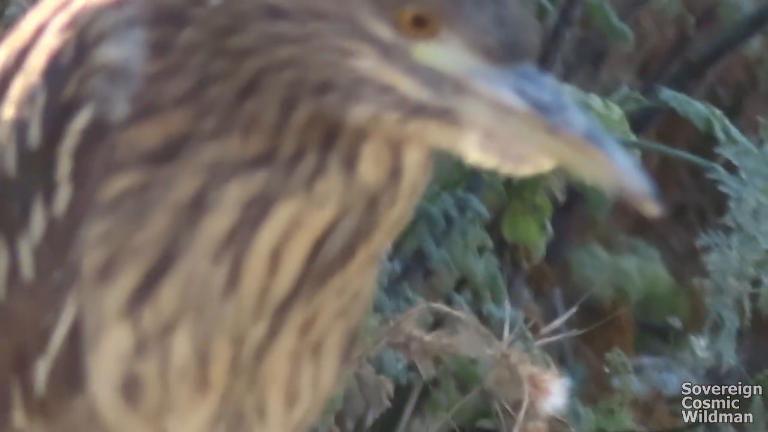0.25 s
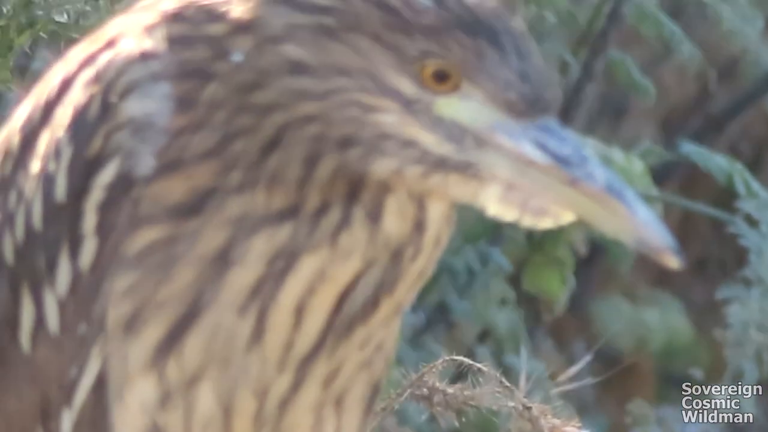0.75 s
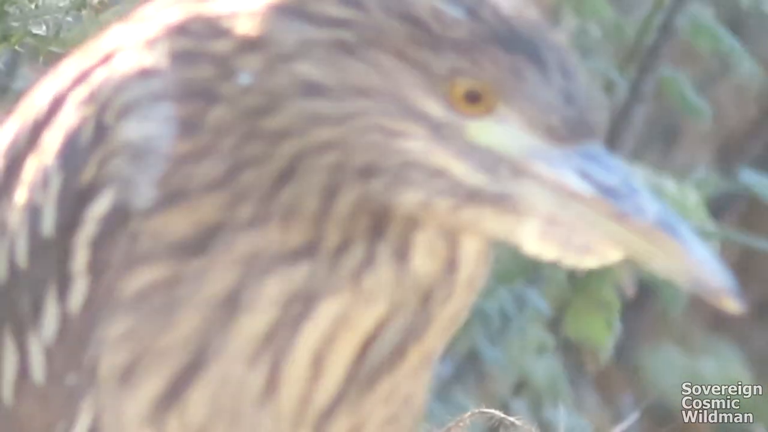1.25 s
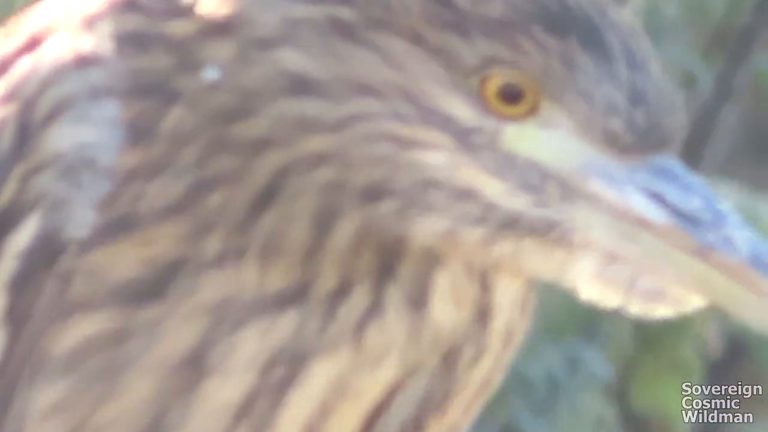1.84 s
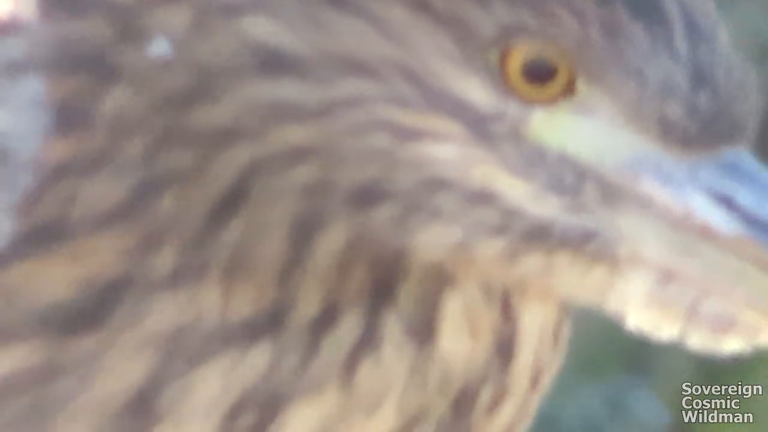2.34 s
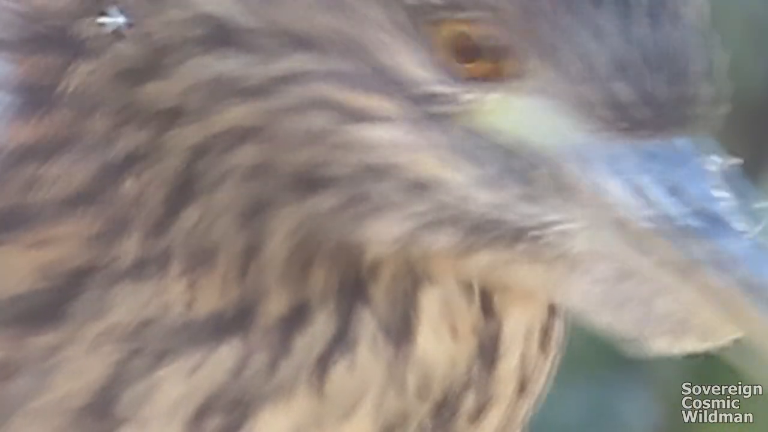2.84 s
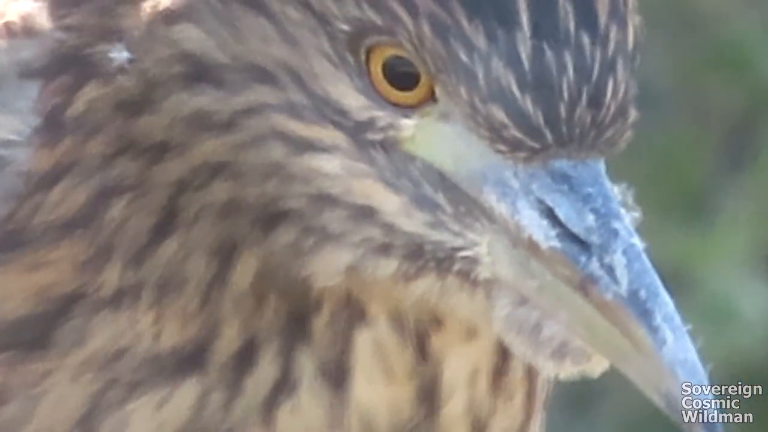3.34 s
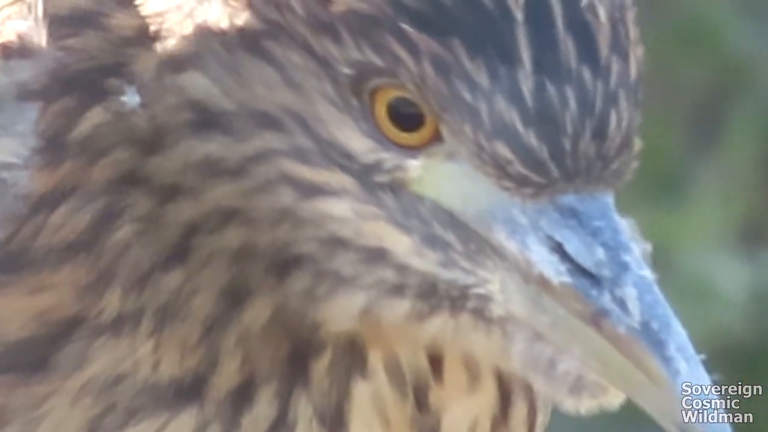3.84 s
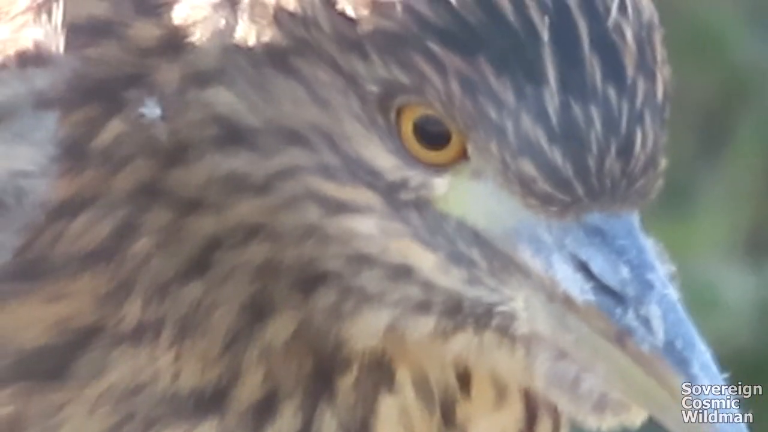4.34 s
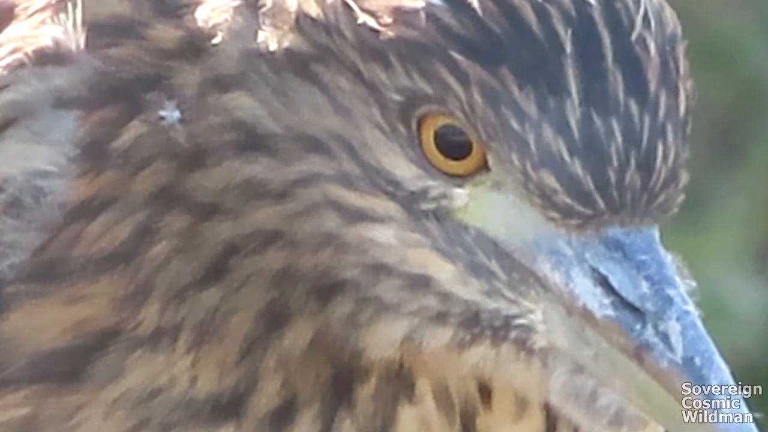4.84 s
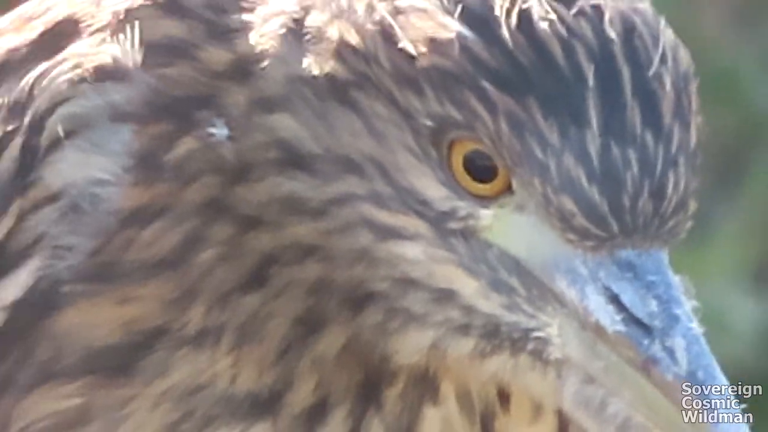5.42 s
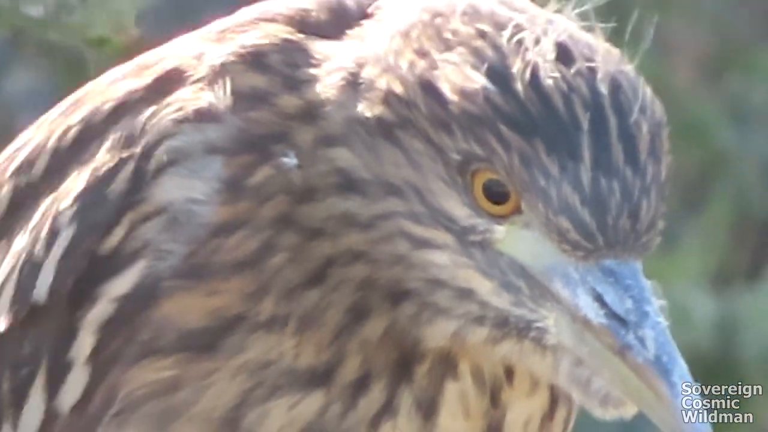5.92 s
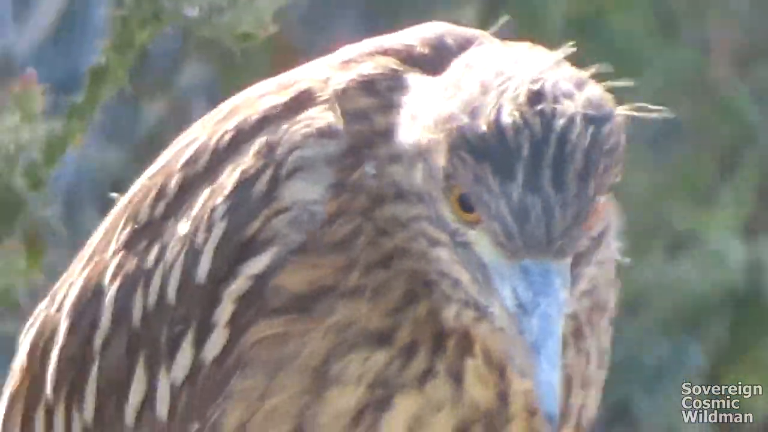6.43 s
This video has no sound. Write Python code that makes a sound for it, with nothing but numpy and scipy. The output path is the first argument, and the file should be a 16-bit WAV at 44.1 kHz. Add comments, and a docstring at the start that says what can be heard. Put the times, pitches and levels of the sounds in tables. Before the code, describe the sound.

From 0 to 0.35 s a small lens motor whines and buzzes close by, with muffled uneven gear knocks. Two light ticks follow, then around 0.42-0.48 s a plastic lever rattles and snaps sharply. From 0.6 to 2.8 s dry little ticks come roughly ten per second over a faint plastic whir; afterwards they are scattered, at 3.2, clustered at 4.3-4.5, and occasional until 5.8 s. Throughout, distant traffic roars softly and an engine idles with a steady low throb. Faint blurred bird notes appear from 0.75 s, and a wavering whistle at 2.5-2.85 s. Nearer falling whistles sound at 3.2-3.55, 3.95-4.15 and, strongest, 4.8-5.15 s, with short leafy echoes. A high chirp comes at 5.7, one soft low hoot at 6.1, quick whistles at 6.4 and a last cut-off note at 6.65 s. Camera sounds lean slightly left in the outdoor stereo.

```python
"""A lens motor whines and knocks at the start; then a lever rattles and snaps and the lens drive ticks.
These contacts ring damped modes of the hand-held camera, over a faint whir in its plastic body.
Outdoors near bushes, small birds whistle gliding sines with leaf echoes, and a low hoot sounds once.
Behind them an engine idles as a sum of harmonics, and far traffic roars softly as shaped stereo noise."""
import sys
import numpy as np
from scipy import signal
from scipy.io import wavfile

SR = 44100
rng = np.random.default_rng(int(sys.argv[2]) if len(sys.argv) > 2 else 0)


def inscribe(sig):
    """Save sig as 16-bit PCM at rate SR to the path in sys.argv[1].

    A 1-D sig is mono; a 2-D sig holds one channel per row.
    Samples are clipped to [-1, 1] before scaling.
    """
    pcm = np.round(np.clip(np.atleast_2d(sig).T, -1, 1) * 32767)
    wavfile.write(sys.argv[1], SR, pcm.astype(np.int16))


N = 294367   # length in samples

MOTOR_END_S = .345


def motor_running():
    """Switching envelope: 1 while the lens motor turns, then a quick linear fall to 0."""
    return np.clip((MOTOR_END_S - np.arange(N) / SR) / .012, 0, 1)


# Resonances of the lens motor housing. Each row: frequency in Hz, width in Hz, whine in dB rms and
# struck level in dB (both before the final low-pass), share of a knock's weight from 0 to 1.
MOTOR_MODES = [(292, 170, -54.5, -8, 0.6), (376, 115, -77, -1, 0.97), (780, 85, -58, 1, 0.14),
               (1054, 100, -59, -6, 0.3), (1500, 20, -61, -26, 0), (1550, 400, -60, -26, 0.2),
               (1690, 70, -56, -28, 0.08)]
# Gear knocks of the motor. Each row: start in seconds, level in dB before the mode gains,
# weight of the low thud in dB, extra level of the modes above 900 Hz in dB.
GEAR_KNOCKS = [(.016, -35, 5.5, 7), (0.041, -36, 1, -12), (.05, -31, -11, -9), (.076, -30, -9, -14),
               (.114, -34, -10, -6), (0.146, -31, 5, -7), (.156, -43, -1, 16), (0.178, -37, 9, -6),
               (.196, -29, -8, -13), (0.219, -42, 9, 12), (0.255, -38, 3, -3), (.277, -29.5, -19, -7),
               (.298, -42, -11, -11), (.318, -31.5, 4, -7), (.341, -30, 8, -4)]
TOOTH_GRAIN_DB = 2   # uneven teeth make the whine buzz
WHINE_HZ, WHINE_DB, WHINE_WAVER = 1505, -56.5, .009   # steady tone of the meshing gear, share it wanders


def lens_motor():
    """Forced and free vibration: gear noise drives the housing's resonances and gear knocks let them ring."""
    s, knock_db, weight_db, upper_db = np.transpose(GEAR_KNOCKS)
    gears = rng.standard_normal(N) * from_db(TOOTH_GRAIN_DB * drift(79.0))
    running = motor_running()
    out = np.zeros(N)
    for hz, width, whine_db, struck_db, share in MOTOR_MODES:
        t60 = np.log(1000) / np.pi / width   # a resonance of this width dies by 60 dB in this time
        clicks = np.zeros(N)
        clicks[(s * SR).astype(int)] = from_db(knock_db + struck_db + share * weight_db + upper_db * (hz > 900))
        out += running * from_db(whine_db) * rms_one(ring(gears, hz, t60))
        out += ring(soften(clicks, 2 * hz), hz, t60)
    whine_hz = WHINE_HZ * (1 + WHINE_WAVER * drift(15.0))
    whine = np.sqrt(2) * np.sin(2 * np.pi * np.cumsum(whine_hz) / SR)
    out += running * from_db(WHINE_DB + TOOTH_GRAIN_DB * drift(25.0)) * whine
    return soften(soften(out, hz=2100), hz=2100)   # the housing passes little above its top mode


# Ticks of the lens drive, a run of ticks while it zooms, lone ones before and after. Each row: start in
# seconds, level in dB before the bounce and mode gains, brightness in dB per octave.
TICKS = [(.377, -32.5, -2), (.391, -32.5, 2.5), (0.6243, -32.5, 5), (0.694, -32, -2), (.794, -36, -15),
         (0.8944, -29, -2.5), (0.995, -33, -11), (1.094, -29.5, -10), (1.195, -41, 3.5), (1.26, -32, -8),
         (1.361, -32.5, 1.5), (1.444, -40, 3.5), (1.461, -31.5, -0.5), (1.561, -37, 3.5),
         (1.661, -31.5, -1), (1.728, -33.5, -9), (1.827, -27.5, -0.5), (1.894, -31.5, 0.5),
         (1.993, -31, -1), (2.062, -32, 2), (2.161, -31, -1), (2.216, -41, 6), (2.229, -30, 1),
         (2.328, -32, 1), (2.395, -32.5, 2), (2.495, -33, 2), (2.563, -33.5, 1), (2.688, -40, 1),
         (2.786, -36, 4), (3.165, -32, 0.5), (3.272, -32.5, 1.5), (4.277, -42.5, 6.5), (4.357, -36, 3.5),
         (4.393, -31.5, -0.5), (4.449, -32.5, 0), (4.474, -31, -1.5), (4.734, -37, 1), (4.9, -34, 3.5),
         (5.09, -30.5, 1), (5.387, -33.5, -0.5), (5.759, -39, -12)]
# Strokes of the lever on the body. Each row: start in seconds, length in seconds, contacts per second,
# level in dB before the mode gains, brightness in dB per octave, contact hardness in Hz.
LEVER = [(0.4155, .024, 404, -33.5, 2, 2480), (0.437, .008, 360, -40.5, 6, 3300),
         (0.443, .009, 630, -72, 14.5, 6500), (0.4678, 0.002, 1800, -37, 6, 4530),
         (0.4697, 0.003, 840, -23.5, -0.5, 4500), (0.473, 0.004, 850, -40, 5.5, 2000),
         (0.481, .003, 810, -31, -2.5, 4500)]
TICK_HARDNESS_HZ = 2300


def contacts(uneven_s):
    """Repeated impact: a tick bounces twice and the lever chatters unevenly; returns one column per property."""
    rows = []
    for s, db, bright in TICKS:
        for lag, drop_db in [(0, -5.5), (.0024, -17), (.0052, -28.5)]:
            rows.append((s + lag, db + drop_db, bright, TICK_HARDNESS_HZ, 1))
    for s, length, per_s, db, bright, hard_hz in LEVER:
        lags = np.arange(0, length, 1 / per_s)
        rows += [(s + lag, db, bright, hard_hz, 0) for lag in lags + uneven_s * rng.random(len(lags))]
    s, db, bright, hard_hz, is_tick = np.transpose(rows)
    return (s * SR).astype(int), db, bright, hard_hz, is_tick


CRACK_DB, CRACK_S, CRACK_HZ = -7.5, 0.0054, (1190, 2090)   # dry noise of a contact: level, dying time, flat band
TICK_CRACK_DB = -9   # the lens drive knocks with less dry noise than the lever


def crack(at, gains):
    """Broadband impact noise: each contact also gives a short, exponentially dying burst."""
    clicks = np.zeros(N)
    clicks[at] = gains
    envelope = signal.lfilter([1], [1, -np.exp(-1 / (CRACK_S * SR))], clicks + 1e-18)
    bursts = envelope * rng.standard_normal(N)
    return soften(signal.lfilter(*signal.butter(1, CRACK_HZ, "band", fs=SR), bursts), hz=4500)


# Modes of the camera body. Each row: frequency in Hz, level in dB when struck by the lever, level in dB
# when struck by the lens drive, 60 dB decay time in seconds, mean whir in dB rms, left minus right in dB.
BODY_MODES = [(407, -4, -9, 0.07, -66, 3), (437, -14, 1, 0.065, -55.5, 3), (690, -2, -9, .012, -80, 3),
              (842.5, -1, 0.5, 0.029, -51, 4), (967.5, -8, -2, 0.04, -51, 5),
              (1062.5, -11, -11, 0.034, -54, 6.5), (1442, 5, -6, 0.0057, -61.5, 4.5),
              (1570, -6, -20, 0.018, -69.5, 3), (1740, -15, -9, 0.027, -64.5, 5.5),
              (2120, -22, -24, 0.018, -80, -11.5), (2780, -17, -17, 0.016, -92, 6),
              (3530, -26, -24, 0.013, -109, 7), (4320, -27, -27, 0.014, -106, -2),
              (5250, -33, -32, 0.0072, -105, -5), (6730, -32, -31, 0.0066, -74, -1),
              (9100, -29, -29, 0.0022, -99, -10)]
WHIR_DURING_MOTOR_DB = -6


def camera_body(grain_db, lag_s):
    """Modal vibration: knocks and a dense fine grinding ring the same modes, most of them louder at the left."""
    at, knock_db, bright, hard_hz, is_tick = contacts(uneven_s=.0004)
    grinding = rng.standard_normal(N) * from_db(grain_db * drift(36.0) + WHIR_DURING_MOTOR_DB * motor_running())
    lowest_hz = BODY_MODES[0][0]
    out = np.zeros((2, N))
    for k, (hz, lever_db, tick_db, t60, whir_db, left_db) in enumerate(BODY_MODES):
        mode_db = np.where(is_tick, tick_db, lever_db) + bright * np.log2(hz / lowest_hz)
        chance_db = rng.normal(0, 1.2, len(at))
        clicks = np.zeros(N)
        clicks[at] = from_db(knock_db + mode_db + chance_db)
        clicks[at] /= 1 + (hz / hard_hz) ** 4   # a soft contact does not reach the high modes
        knocks = ring(soften(clicks, 2 * hz), hz, t60)
        whir = from_db(whir_db + 1.43 * drift(0.99)) * rms_one(ring(soften(grinding, 2 * hz), hz, t60))
        sense = (-1) ** max(k, 1)   # above the low pair, neighbours start in opposite senses
        out += sense * pan(knocks + whir, left_db)
    crack_db = knock_db + CRACK_DB + TICK_CRACK_DB * is_tick + bright * np.log2(CRACK_HZ[1] / lowest_hz)
    crack_gain = from_db(crack_db) / (1 + (CRACK_HZ[1] / hard_hz) ** 2)
    out += pan(crack(at, crack_gain), left_db=3.0)
    out[1] = np.interp(np.arange(N) - lag_s * SR, np.arange(N), out[1])   # the right port hears it later
    return out


# Loudness of a singing throat by pitch. Each row: pitch in Hz, gain in dB.
THROAT = [(2000, -3), (2450, -6.5), (3100, -1), (3600, -11), (4000, -24), (5000, -23)]
FLICK_S, RIPPLE, SWELL_S = .009, .01, .006   # half width of the flick (s), share the pitch ripples, onset (s)
UPSTROKE_DB = -6   # the rising half of the flick is fainter
ACCENT_DB, ACCENT_S = 4, .018   # the note is struck harder around the peak of a flick


def sung(s, length, flick_hz, from_hz, held_hz, slide, bend, drop_hz, drop, db, fade_db):
    """Frequency modulation: an up-and-down flick, a slide to a held pitch, a drop; the throat weights each pitch."""
    lead = 1.3 * FLICK_S if flick_hz > 300 else 0
    t = np.arange(-lead, length, .0005)
    hz = held_hz + (from_hz - held_hz) * np.clip(1 - t / slide, 0, 1) ** bend
    hz += flick_hz * np.where(t < 0, 1 + t / FLICK_S, np.clip(1 - t / FLICK_S, 0, 1) ** 1.3)
    hz *= 1 + RIPPLE * np.interp(t, np.arange(20) * .008, rng.standard_normal(20))
    hz -= drop_hz * np.clip(1 - (length - t) / drop, 0, 1)
    onset_db = 20 * np.log10(np.clip((t + lead) / SWELL_S, .05, 1))
    onset_db += UPSTROKE_DB * np.clip(-t / FLICK_S, 0, 1)
    onset_db += ACCENT_DB * (lead > 0) * np.exp(-np.abs(t) / ACCENT_S)
    level_db = db + at_hz(THROAT, hz) + fade_db * np.clip(t / length, 0, 1) + onset_db
    return np.transpose([s + t, hz, level_db])


def peep(s, length, from_hz, to_hz, db, waver=0):
    """Decelerating glide: a plain note as a table whose pitch slows to its end while the level swells and sinks."""
    along = np.linspace(0, 1, 3 + int(length / .008))
    hz = to_hz + (from_hz - to_hz) * (1 - along) ** 2
    hz *= 1 + waver * rng.standard_normal(len(along))
    swell_db = 10 * np.log10(np.sin(np.pi * along ** .7) ** 2 + .1)
    return np.transpose([s + length * along, hz, db + swell_db])


# Song of a near bird. Each row: start in seconds, length in seconds, opening flick in Hz, first pitch in Hz,
# held pitch in Hz, slide in seconds, bend of the slide (1 straight, 2 bowed), closing drop in Hz,
# drop time in seconds, level in dB before throat and onset, level change along the note in dB.
SONG = [(3.235, 0.056, 0, 3700, 2600, 0.046, 0.83, 0, .01, -47.5, -2),
        (3.316, 0.095, 804, 2880, 2390, 0.043, 1.1, 452, 0.018, -47.5, -3.5),
        (3.468, 0.087, 0, 2780, 2306, 0.042, 1.2, 330, .022, -53.5, 4),
        (3.958, 0.056, -2, 3800, 3060, 0.048, 1.2, 250, 0.0074, -57, 10),
        (4.045, 0.11, 347, 3250, 2580, 0.074, 2, 520, .022, -49.5, -10),
        (4.799, 0.06, 0, 3860, 3030, 0.047, 1.85, 645, .007, -42, -1.5),
        (4.887, 0.099, 2000, 2960, 2550, 0.09, 1.8, 520, 0.013, -39.5, -6),
        (5.067, 0.079, -2, 3000, 2390, 0.055, 2.5, 280, 0.013, -50.5, -4)]
# Whistles of other birds close by, one table each. Each row: time in seconds, pitch in Hz,
# level in dB rms before the flutter.
WHISTLES = [
    [(2.528, 3300, -63), (2.545, 3770, -61), (2.563, 3760, -61), (2.568, 3650, -63), (2.604, 3600, -61),
     (2.625, 3400, -54.5), (2.666, 3005, -59), (2.718, 2945, -55), (2.755, 3070, -53.5), (2.785, 3200, -55),
     (2.806, 3200, -57.5), (2.818, 3100, -66), (2.828, 2900, -69), (2.84, 2650, -62), (2.858, 2400, -65)],
    [(5.66, 4240, -58), (5.666, 3900, -53.5), (5.68, 4150, -59), (5.71, 4390, -62), (5.755, 4360, -65)],
    [(6.39, 2350, -56), (6.402, 2570, -50), (6.41, 3050, -45.5), (6.418, 2390, -47), (6.435, 2140, -57),
     (6.475, 2440, -46.5), (6.487, 2370, -58)],
    [(6.653, 2880, -55), (6.662, 3310, -57), (6.69, 3300, -52)],
]
# Blurred notes from farther off. Each row: start in seconds, length in seconds, first pitch in Hz,
# last pitch in Hz, level in dB before the swell, breakup from 0 to 1.
FAR_NOTES = [(0.752, 0.05, 2300, 2290, -56.5, .1), (0.953, 0.05, 2330, 2260, -60, .6),
             (1.155, 0.06, 2720, 2600, -61, .6), (1.2, 0.15, 2480, 2300, -59, .45),
             (2.042, 0.055, 2800, 2210, -60, 1), (2.24, .04, 2180, 2330, -58, .3),
             (2.306, .028, 2910, 2850, -59, .6), (2.306, 0.026, 3590, 3520, -61, .5),
             (2.4, .015, 4380, 4180, -67, .4), (2.424, .028, 3740, 3760, -63, .3),
             (2.555, .018, 2180, 2300, -56, .4), (2.665, 0.063, 2046, 2000, -55, .1),
             (2.675, .035, 3380, 3700, -64.5, .2), (2.708, .038, 3720, 3350, -66, .3),
             (2.79, .045, 1970, 1940, -59, .3), (3.944, 0.012, 2700, 2470, -57, .4),
             (4.45, 0.064, 3570, 3880, -65, .4), (6.115, 0.11, 2070, 2030, -57.5, .15),
             (6.22, .09, 2030, 1990, -62, .4)]
FLUTTER_DB = 1.8
WAVER = .008   # share by which a far note's pitch wanders


def birds(near_echo_db, far_echo_db):
    """Multiple scattering: leaves smear whistles into echoes; far ones break up in moving air and echo more."""
    near_notes = [sung(*row) for row in SONG] + WHISTLES
    near = sum(glide(note) for note in near_notes) * from_db(FLUTTER_DB * drift(40.0))
    air = drift(110.0)
    far = np.zeros(N)
    for *row, breakup in FAR_NOTES:
        far += glide(peep(*row, waver=WAVER)) * (np.sqrt(1 - breakup) + np.sqrt(breakup) * air)
    t = np.arange(int(.2 * SR)) / SR
    tail = rng.standard_normal((2, len(t))) * from_db(-60 * t / 0.24)
    tail /= np.sqrt(np.sum(tail[0] ** 2))
    sent = from_db(near_echo_db) * near + from_db(far_echo_db) * far
    echoes = signal.fftconvolve(sent[None], tail, axes=1)[:, :N]
    return near + far + echoes


# A brief low hoot in the distance. The row: start in seconds, length in seconds, first pitch in Hz,
# last pitch in Hz, level in dB before the swell.
HOOT = (6.108, .088, 283, 281, -41)
HOOT_OCTAVE_DB = -11


def distant_hoot():
    """Harmonic tone: a nearly level low fundamental with a fainter octave."""
    note = peep(*HOOT)
    return glide(note) + from_db(HOOT_OCTAVE_DB) * glide(note, multiple=2)


# Speed of the idling engine. Each row: time in seconds, firings per second.
ENGINE_SPEED = [(0, 23.73), (.33, 23.73), (1.25, 23.28), (2, 23.4), (2.45, 23.24), (2.8, 23.24),
                (3.25, 23.41), (4.1, 23.5), (4.6, 23.42), (5.9, 23.46), (6.67, 23.26)]
# Exhaust throb. Each row: multiple of the firing rate, level in dB rms before waver and swell.
ENGINE_ORDERS = [(2, -41), (3, -49.5), (4, -58), (5, -42.5), (6, -46), (7, -51.5), (11, -56.5)]
FIRST_FIRING_S, ENGINE_SWELL_DB_PER_S = .0218, 0.12


def engine(waver_db):
    """Harmonic series: one suction pulse per firing, its orders dipping together and wavering on their way here."""
    speed, = in_time(ENGINE_SPEED)
    angle = 2 * np.pi * (np.cumsum(speed) / SR - speed[0] * FIRST_FIRING_S)
    throb = np.zeros(N)
    for order, db in ENGINE_ORDERS:
        height = np.sqrt(2) * from_db(db + waver_db * drift(2.06))
        throb -= height * np.cos(order * angle + 0.71 * drift(0.37))
    return from_db(ENGINE_SWELL_DB_PER_S * np.arange(N) / SR) * throb


# Spectrum of far traffic and air. Each row: frequency in Hz, relative density in dB per Hz.
TRAFFIC_SPECTRUM = [(20, 9), (45, -3), (90, 6), (170, -2), (260, -8.5), (400, -15.5), (650, -15),
                    (1300, -28.5), (2200, -28), (3500, -31), (6000, -37.5), (9000, -44.5), (13000, -50.5),
                    (15500, -52.5)]
# Background level and tone: one colour under the opening motor, another after it. Each row: time in seconds,
# overall level in dB, extra level near 300 Hz in dB, extra level near 1300 Hz in dB.
BACKGROUND_LEVEL_AND_TONE = [(0, -40.5, 9.5, -45), (.5, -39, -0.5, 5), (1.2, -39.5, 0, 7),
                             (2.6, -39, -0.5, 6.5), (4.5, -39.5, 0, 2), (6, -40, 1, 5),
                             (6.3, -39.5, 1.5, 9), (6.67, -40, -1, 9)]
# Correlation of the two channels. Each row: frequency in Hz, left-right likeness (1 is identical).
LIKENESS = [(60, 1.0), (130, 1.0), (290, 0.87), (640, 0.82), (1410, 0.51), (3100, 0.44), (6820, 0.16),
            (15000, 0.15)]


def traffic(patchy_db):
    """Partly coherent noise: half-octave stereo bands, each with its own level, flicker and likeness."""
    level_db, low_db, high_db = in_time(BACKGROUND_LEVEL_AND_TONE)
    out, together = np.zeros((2, N)), drift(1.5)
    edges = 17 * 2 ** np.arange(0, 10.1, .5)
    white = rng.standard_normal((2, 2, N))   # neighbouring bands take different noise
    for k, (low, high) in enumerate(zip(edges, edges[1:])):
        band = signal.butter(2, [low, high], "band", fs=SR, output="sos")
        mid, side = signal.sosfilt(band, white[k % 2])
        hz = np.sqrt(low * high)
        alike = np.clip(at_hz(LIKENESS, hz), -1, .99)
        tone_db = low_db * np.exp(-np.log2(hz / 300) ** 2) + high_db * np.exp(-4 * np.log2(hz / 1300) ** 2)
        flicker_db = patchy_db * (.4 * together + drift(10.5))
        gain = from_db(at_hz(TRAFFIC_SPECTRUM, hz) + tone_db + flicker_db)
        out += gain * (np.sqrt(1 + alike) * mid + np.sqrt(1 - alike) * side * [[1], [-1]])
    return from_db(level_db) * rms_one(out)


def from_db(db):
    """Logarithmic level: decibels to gain."""
    return 10 ** (np.asarray(db) / 20)


def rms_one(x):
    """Effective value: scale to rms 1."""
    return x / np.sqrt(np.mean(x ** 2) + 1e-20)


def in_time(rows):
    """Linear interpolation: columns of a curve table at every sample."""
    s, *columns = np.transpose(rows)
    return [np.interp(np.arange(N) / SR, s, c) for c in columns]


def at_hz(points, hz):
    """Logarithmic pitch scale: read a spectrum table on a log-frequency axis."""
    table_hz, value = np.transpose(points)
    return np.interp(np.log(hz), np.log(table_hz), value)


def drift(rate):
    """Random fluctuation: noise through a double one-pole low-pass at rate in Hz, spread 1."""
    r = np.exp(-80 * np.pi * rate / SR)   # one step per 40 samples
    slow = signal.lfilter([1], [1, -2 * r, r * r], rng.standard_normal(N // 40 + 2002))[2000:]
    return np.interp(np.arange(N) / 40, np.arange(len(slow)), rms_one(slow))


def ring(clicks, hz, t60):
    """Damped resonance: a unit click sets a dying sine of initial height 1 ringing."""
    r, w = from_db(-60 / (t60 * SR)), 2 * np.pi * hz / SR
    return signal.lfilter([0, np.sin(w)], [1, -2 * r * np.cos(w), r * r], clicks + 1e-18)


def soften(x, hz):
    """Finite contact time: low-pass the force."""
    return signal.lfilter(*signal.butter(2, hz, fs=SR), x + 1e-18)


def glide(note, multiple=1):
    """Phase integration: a sine that follows a note table, with soft ends."""
    s, hz, db = np.transpose(note)
    at = np.arange(int(s[0] * SR), min(int(s[-1] * SR), N))
    t, out = at / SR, np.zeros(N)
    sounding = np.clip(np.minimum(t - s[0], s[-1] - t) / .002, 0, 1)
    angle = 2 * np.pi * multiple * np.cumsum(np.interp(t, s, hz)) / SR
    out[at] = sounding * np.sqrt(2) * from_db(np.interp(t, s, db)) * np.sin(angle)
    return out


def pan(x, left_db):
    """Level difference: two channels, the left louder by left_db."""
    return x * from_db([[left_db / 2], [-left_db / 2]])


def scene():
    """Superposition: all sources add at the two microphone ports."""
    camera = camera_body(grain_db=2.0, lag_s=.00003) + pan(lens_motor(), left_db=3.5)
    calls = birds(near_echo_db=-8.5, far_echo_db=-2) + distant_hoot()
    return camera + calls + engine(waver_db=1.0) + traffic(patchy_db=1.35)


MONO_BELOW_HZ, CUTOFF_HZ = 215, 15900


def record(dry):
    """Recorder filtering: the bass is made mono and a steep low-pass cuts the top."""
    mid, side = (dry[0] + dry[1]) / 2, (dry[0] - dry[1]) / 2
    side = signal.sosfilt(signal.butter(3, MONO_BELOW_HZ, "high", fs=SR, output="sos"), side)
    return signal.sosfilt(signal.cheby2(12, 70, CUTOFF_HZ, fs=SR, output="sos"), [mid + side, mid - side])


dry = scene()
out = record(dry)
inscribe(out)
```